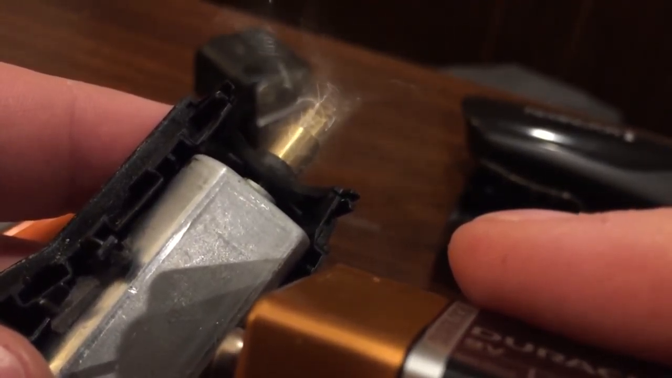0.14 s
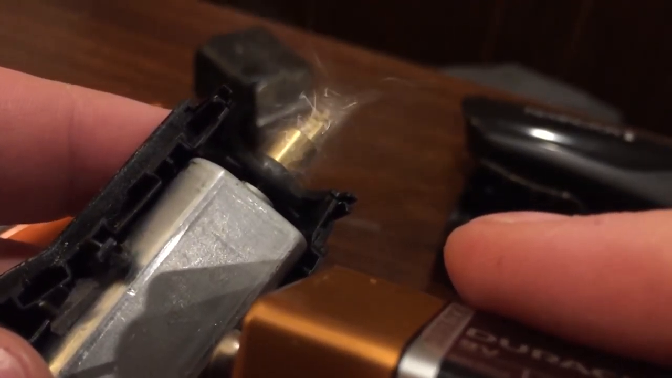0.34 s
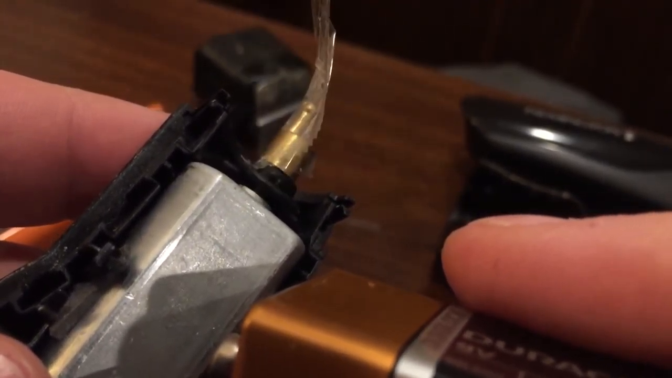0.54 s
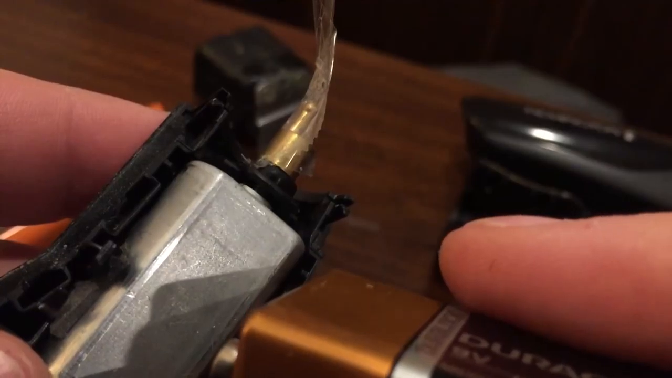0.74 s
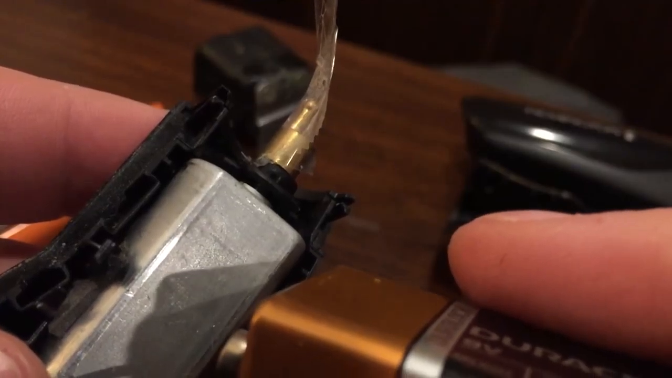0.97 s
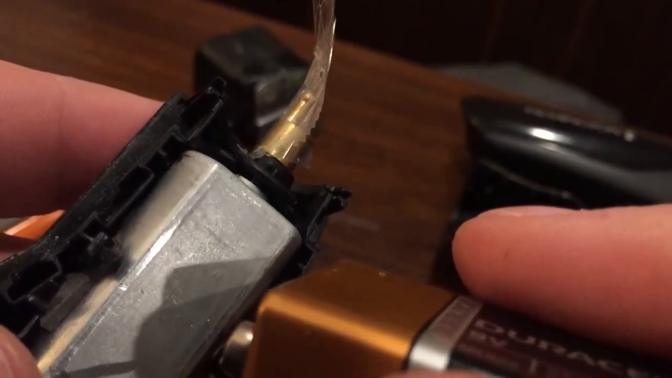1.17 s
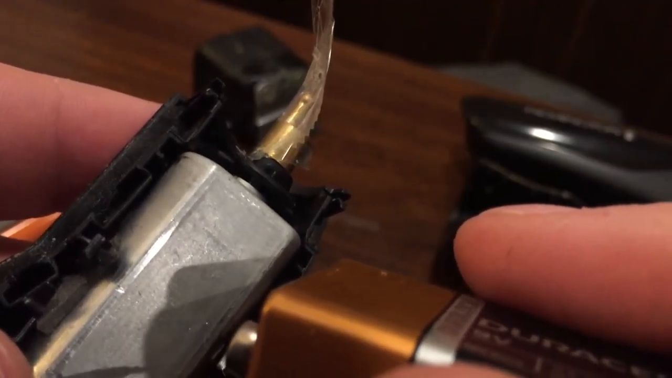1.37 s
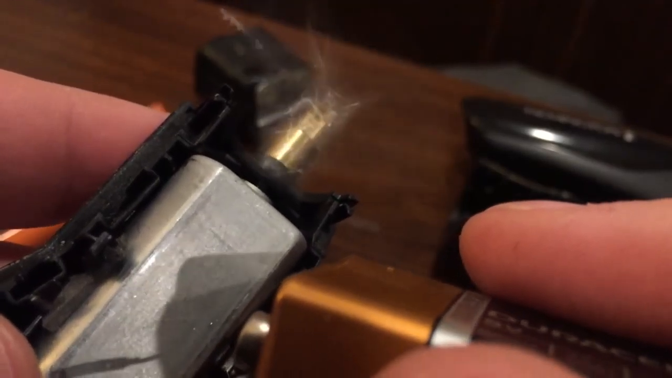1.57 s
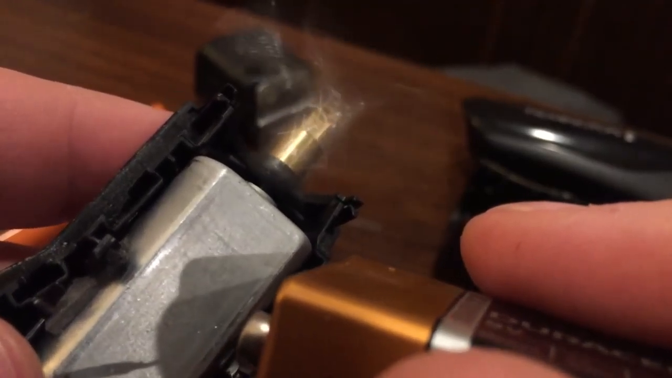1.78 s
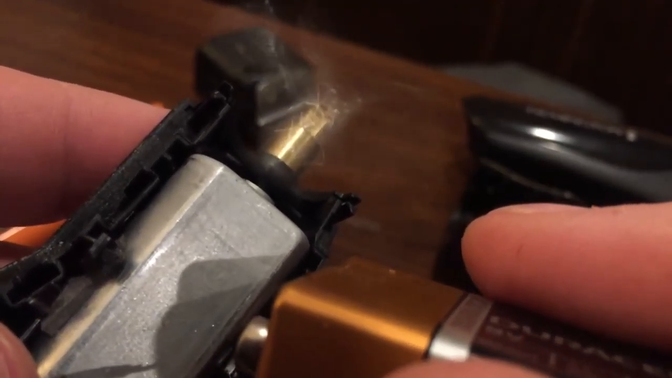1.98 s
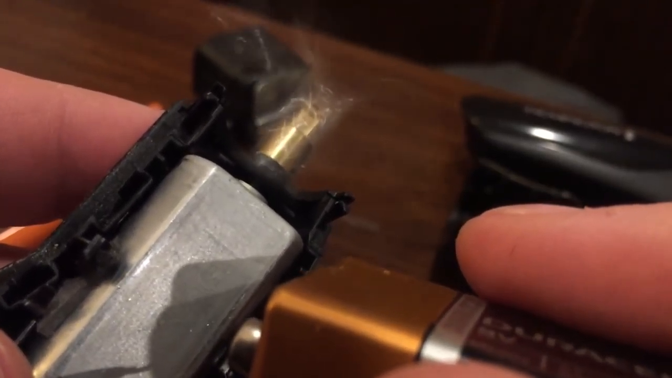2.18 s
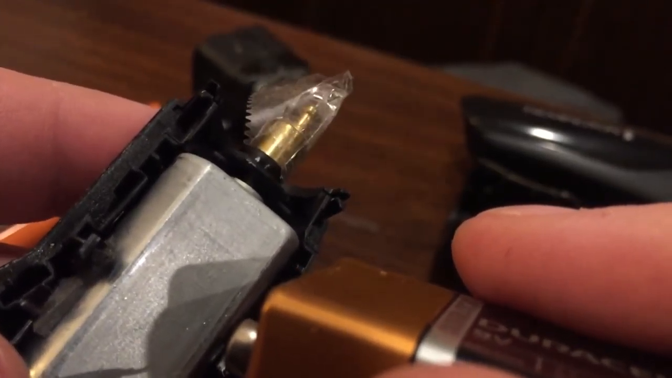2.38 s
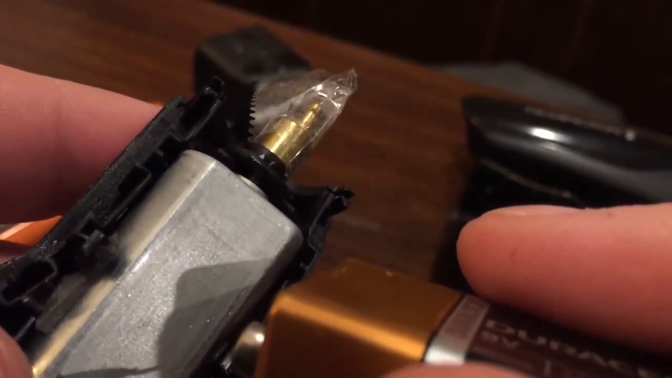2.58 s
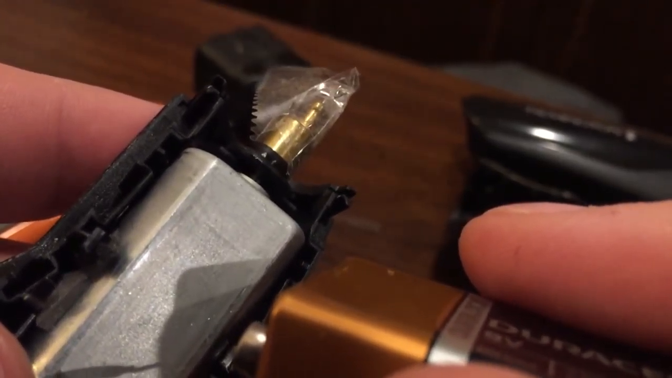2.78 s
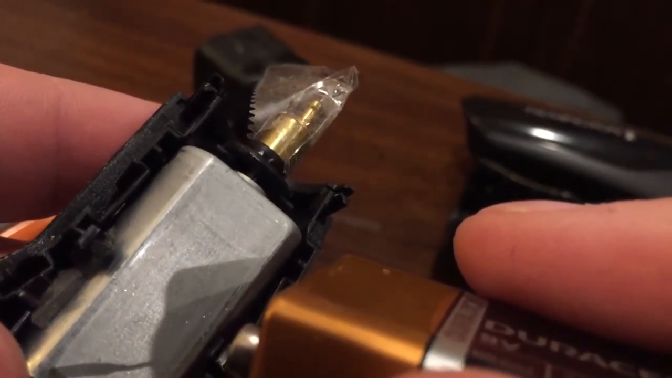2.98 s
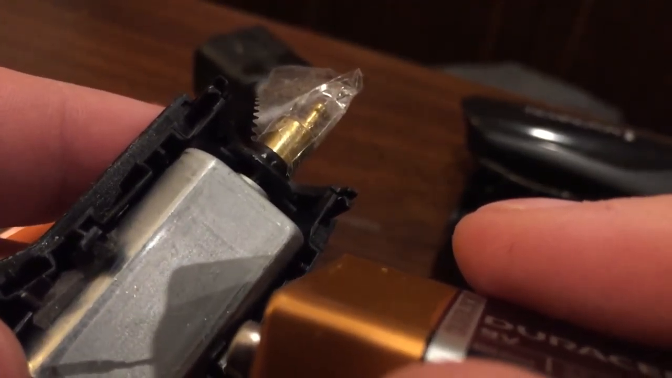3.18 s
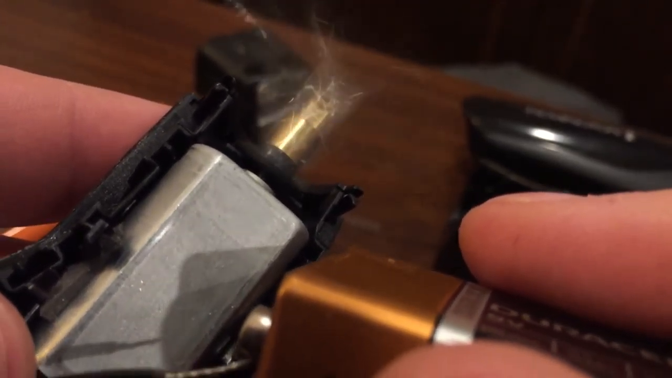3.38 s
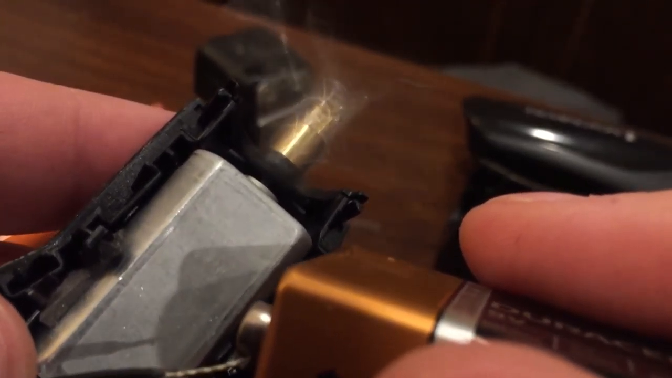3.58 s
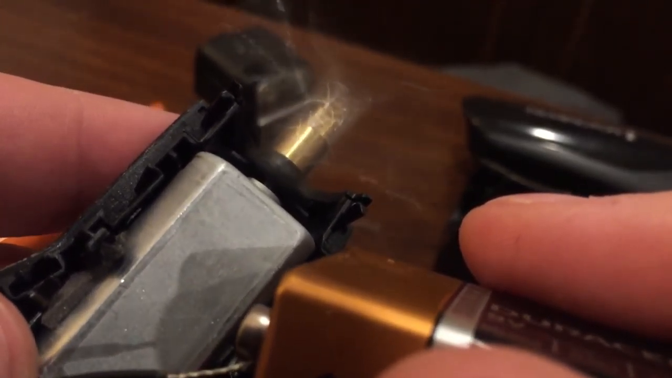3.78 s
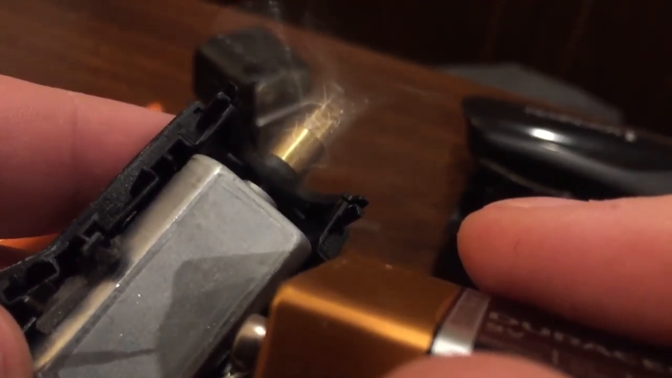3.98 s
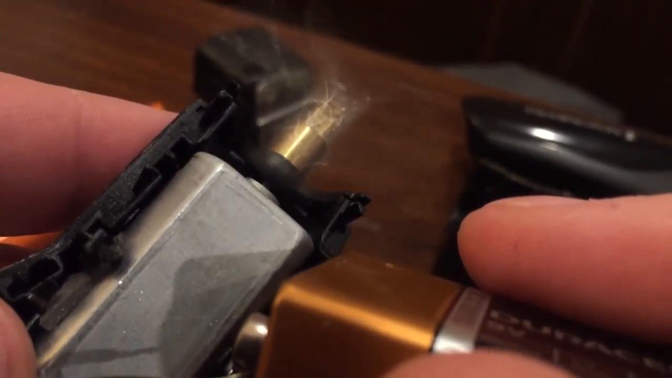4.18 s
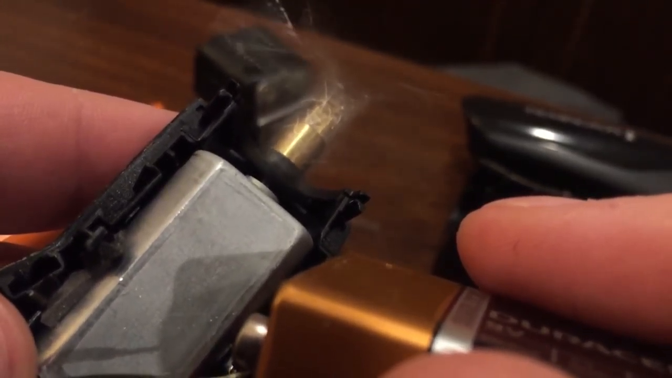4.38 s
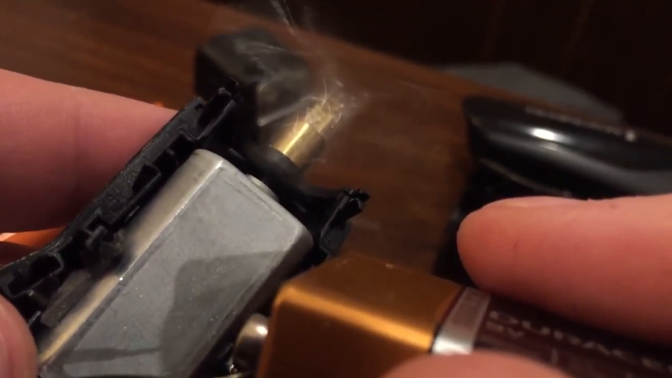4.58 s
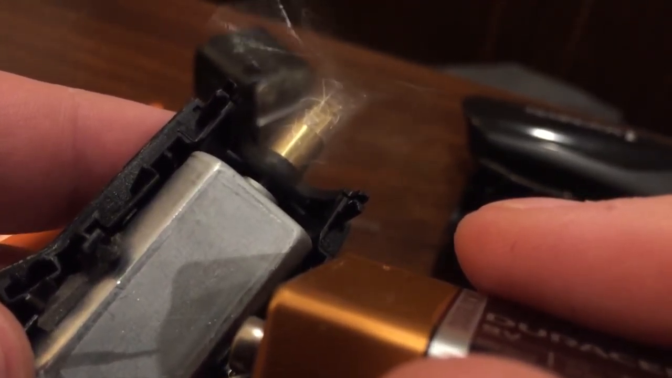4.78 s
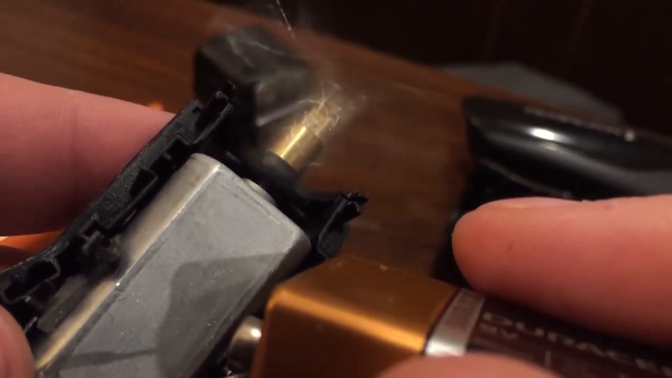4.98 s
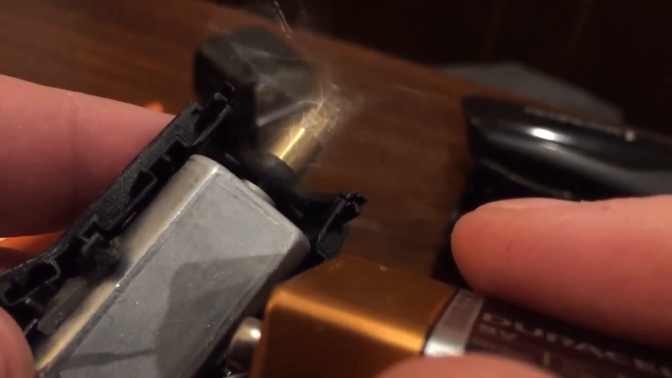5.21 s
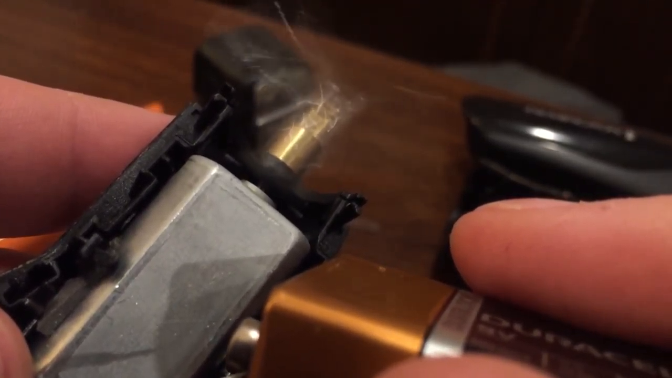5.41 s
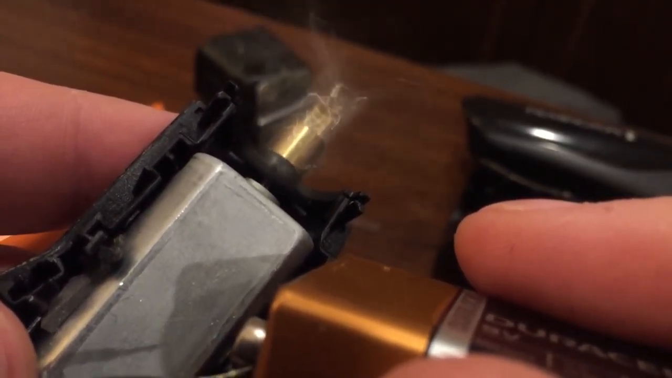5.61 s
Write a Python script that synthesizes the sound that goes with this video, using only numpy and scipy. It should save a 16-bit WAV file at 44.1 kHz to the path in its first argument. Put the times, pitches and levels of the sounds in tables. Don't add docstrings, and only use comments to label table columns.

```python
import sys
import numpy as np
from scipy import signal
from scipy.fft import rfft, irfft, next_fast_len
from scipy.io import wavfile
from scipy.ndimage import uniform_filter1d, map_coordinates

SR = 44100
rng = np.random.default_rng(int(sys.argv[2]) if len(sys.argv) > 2 else 0)


def gain_from_decibels(decibels):
    exponent = np.asarray(decibels, float) / 20
    return 10 ** exponent


def wav_record(signal):
    frames = np.transpose(np.atleast_2d(signal))
    bounded = np.clip(frames, -1, 1)
    quanta = np.round(bounded * 32767).astype(np.int16)
    wavfile.write(sys.argv[1], SR, quanta)


N = 249165

# (frequency [Hz], level [dB per Hz])
ROOM_MURMUR = [(25, -48), (60, -27), (200, -20.5), (270, -14), (370, -4), (440, -10.5), (580, 0), (730, -8),
               (800, -18), (1100, -18), (1500, -22.5), (2000, -28.5), (2700, -28.5), (3300, -48)]
# (frequency [Hz], width [Hz], level [dB])
APPLIANCE_TONES = [(91, 13, -67), (1677, 7.9, -65.5)]
# (frequency [Hz], level [dB per Hz])
MIC_HISS = [(1500, -29), (3000, -4), (4300, -3.5), (7000, -13.5), (10500, -16.5), (15700, -21)]
# (frequency [Hz], time [s])
ECHO_TIME = [(300, 0.23), (3000, .2), (12000, 0.052)]

# (time [s], peak [dB], bracket [relative dB], treble [relative dB])
FINGER_TICKS = [(0.7626, -40, -20, -21), (0.7707, -40.5, -18, -26), (0.7804, -49, -7.5, -25),
                (0.8027, -48, -11, -27), (0.8565, -51, 3, -19), (0.864, -44.5, 9.5, -29),
                (0.875, -35, -17, -25), (0.879, -41, -20, -22), (1.0447, -46, -1, -20),
                (1.061, -49, -2, -19.5), (1.1, -44, -10, -18), (1.108, -48, 1, -18), (1.1494, -46, -9, -23),
                (1.3177, -42, -12, -25.5), (1.325, -41, -10, -24), (1.332, -45, -18, -30),
                (1.384, -48, -7, -21), (1.491, -46, -15, -28), (1.5, -46, -14, -24), (2.471, -37, -23, -15),
                (2.6284, -43, -13, -21), (2.8647, -36.5, -18, -29), (2.9167, -55, 2.5, -21),
                (3.3015, -46.5, -6, -27), (3.31, -49, -10, -22), (3.317, -38.5, -17, -29),
                (3.3533, -33.5, -19, -21), (3.373, -31, -13, -11), (3.4301, -43, -9, -22),
                (3.4457, -36, -12, -23)]
# (time [s], peak [dB], bracket [relative dB], treble [relative dB])
SHARP_SNAPS = [(0.441, -20, -2, -8), (0.451, -28, -3, -5), (0.4627, -28, -6, 6), (0.484, -32.5, -14, -6),
               (0.4898, -30, -19, -12), (0.4973, -17.5, -13, 2.5), (1.6266, -33, -2, -12),
               (1.638, -28, -8, 2), (1.651, -17, -19, 3.5), (1.6673, -19.5, -17, -8),
               (1.677, -15.5, -24, -3), (1.688, -12.5, -20, -12), (1.6974, -8, -21, -9.5),
               (2.3553, -24.5, -14, -7), (2.378, -17, -32, -2), (2.391, -40, -12, -11.5),
               (3.1565, -20, -18, -10.5), (3.453, -30.5, -5, -14), (3.463, -34, -20, 5),
               (3.473, -31, -11, 0), (3.487, -13.5, -21, -3), (3.507, -13.5, -24, -8),
               (3.5386, -9, -22, -14), (3.5515, -8, -22, -9)]
# (frequency [Hz], width [Hz], level [dB])
HOUSING_PEAKS = [(2560, 647, -2.5), (3390, 860, 0), (4250, 600, 2), (5860, 1100, -2.5), (7390, 1700, -4.5)]
# (frequency [Hz], width [Hz], level [dB])
SHEET_PEAKS = [(8750, 910, -7), (9740, 500, 11), (10250, 1480, 9), (11000, 430, 12), (11400, 700, 5.5),
               (12600, 800, 4.5), (13750, 540, 5), (15300, 1500, -7.5)]

# (on [s], off [s], unloaded speed [Hz], tape lift [dB])
BATTERY_CONTACTS = [
    (0.0, 0.244, 147.3, 2.5),
    (0.255, 0.343, 144.9, -0.3),
    (0.378, 0.421, 114.8, 1),
    (0.455, 0.475, 62.05, -2.5),
    (1.648, 2.293, 150.7, 1.6),
    (3.462, 4.747, 150.5, 0.85),
    (4.784, 5.7, 151.6, 0.7),
]
# (time [s], drag [Hz], rasp [dB])
GEAR_BINDS = [(0.116, 30.8, 1.5), (0.231, 26.5, 1), (1.81, 16.7, 0), (1.908, 10.2, 2), (2.068, 27.3, 2),
              (2.229, 17.2, 1.5), (3.606, 4.9, 1.5), (3.725, 10.3, 0.3), (3.909, 28, 2), (4.066, 11.2, 0.3),
              (4.249, 25.7, 2), (4.415, 7.4, -0.8), (4.61, 27.3, 2.5), (4.718, 14.2, 0.7), (4.97, 25.5, 3),
              (5.121, 14.5, 0.8), (5.291, 29.5, 2.5), (5.435, 14.8, 0.9), (5.609, 25.9, 3)]
# (speed [Hz], level [dB])
WHIRR_BY_SPEED = [(5, -84.5), (25, -42), (45, -35.5), (70, -29), (105, -23), (145, -21)]
# (speed [Hz], level [dB])
FLUTTER_BY_SPEED = [(5, -82), (25, -49), (45, -45.5), (70, -38.5), (105, -31), (145, -27.5)]

# (speed [Hz], hum [dB])
SHAKING_BY_SPEED = [(8, -95), (30, -72), (48, -49), (62, -34), (94, -23.5), (124, -20), (144, -16)]
# (multiple of the turning rate [1], level [dB], phase [rad])
SHAKING_OVERTONES = [(2, -13.5, 0.89), (4, -40.5, -0.98)]
# (frequency [Hz], level [dB per Hz])
HAND_RATTLE = [(20, -35), (50, -6), (80, -4), (200, -5), (400, -16), (800, -19), (1200, -15), (1600, -54.5),
               (2500, -120)]
# (multiple of the turning rate [1], level [dB])
MAGNET_WHINE = [(5, -11), (6, -13.5), (7, -8), (8, -9.5), (9, -15.5), (10, -2), (11, -15), (12, -9.5),
                (13, -12.5), (14, -11.5), (15, -10), (16, -8.5), (19, -11), (20, -5), (25, -13),
                (26, -13.5)]
# (frequency [Hz], width [Hz], level [dB])
BRACKET_PEAKS = [(1910, 95, 13.5), (2760, 120, 8), (3527, 380, 11)]
# (place in the turn [0-1], click [dB])
COMMUTATOR_GAPS = [(0.042, -3.5), (0.361, -9.5), (0.579, -7)]
# (frequency [Hz], width [Hz], level [dB])
CASING_PEAKS = [(1443, 160, -11.5), (1988, 93, -5), (2722, 268, -7), (3540, 220, -1), (3857, 380, -2.5),
                (4491, 160, 9), (5190, 510, -2.5), (6025, 290, -6), (6534, 170, -3), (7300, 650, -12)]
# (frequency [Hz], width [Hz], depth [dB])
CASING_HOLES = [(2390, 780, -2.5), (3180, 150, -5.5), (4736, 250, -23.5), (6400, 450, -10),
                (10340, 770, -3.5)]


def unit(x):
    return x / np.sqrt(np.mean(x ** 2) + 1e-20)


def noise():
    return rng.standard_normal(N)


def along(points, hz):
    f, v = np.transpose(points)
    return np.interp(np.log(hz + 1), np.log(f + 1), v)


def wobble(rate):
    knots = rng.standard_normal(int(N * rate / SR) + 4)
    return map_coordinates(knots, [np.arange(N) * rate / SR])


def filtered(x, response):
    m = next_fast_len(N + SR // 2)
    return irfft(rfft(x, m) * response(np.fft.rfftfreq(m, 1 / SR)), m)[:N]


def resonances(peaks):
    def response(f):
        return sum((-1) ** k * gain_from_decibels(db) * 1j * f * w / (c * c - f * f + 1j * f * w)
                   for k, (c, w, db) in enumerate(peaks))
    return response


def shaped_noise(spectrum):
    return unit(filtered(noise(), lambda hz: gain_from_decibels(along(spectrum, hz))))


def room_tone():
    murmur = gain_from_decibels(-50 + 0.8 * wobble(11) + 1.1 * wobble(50)) * shaped_noise(ROOM_MURMUR)
    tones = np.zeros(N)
    for hz, width, db in APPLIANCE_TONES:
        tone = unit(filtered(noise(), resonances([(hz, width, 0)])))
        tones += gain_from_decibels(db + 3.5 * wobble(16)) * tone
    return murmur + tones + gain_from_decibels(-74) * shaped_noise(MIC_HISS)


def walls(x):
    hz, t, z = signal.stft(rng.standard_normal(SR // 2), SR, nperseg=256)
    fade = gain_from_decibels(-60 * t / along(ECHO_TIME, hz)[:, None])
    tail = signal.istft(z * fade, SR, nperseg=256)[1]
    return signal.fftconvolve(x, tail / np.linalg.norm(tail))[:N]


def ticks():
    finger_t60_ms, snap_t60_ms = 16.4, 14.4
    contacts = [(*row, finger_t60_ms) for row in FINGER_TICKS]
    contacts += [(*row, snap_t60_ms) for row in SHARP_SNAPS]
    bursts = np.zeros((3, N + SR))
    t = np.arange(SR // 10) / SR
    for s, db, bracket_db, treble_db, t60_ms in sorted(contacts):
        onset = 1 - np.exp(-t / (0.00012 * t60_ms))
        scrape = gain_from_decibels(db - 60000 * t / t60_ms) * onset * rng.standard_normal(len(t))
        shares = gain_from_decibels(np.array([[bracket_db + 20.5], [8], [treble_db - 0.5]]))
        start = round(s * SR)
        bursts[:, start:start + len(t)] += shares * scrape
    bracket = filtered(bursts[0, :N], lambda hz: resonances([(1750, 500, 0)])(hz) ** 2)
    housing = filtered(bursts[1, :N], lambda hz: resonances(HOUSING_PEAKS)(hz) ** 2)
    return bracket + housing + filtered(bursts[2, :N], resonances(SHEET_PEAKS))


def shaft():
    start_hz, spin_up_s, brake_hz_per_s = 121.08, 0.125, 1209
    current_gain_db, stall_db = 1.4, 9
    bind_s, rasp_s, rasp_late_s = 0.064, 0.03, 0.021
    tape_rasp = 1.8
    t = np.arange(N) / SR
    speed, live, lift_db = np.full(N, start_hz), np.zeros(N), np.zeros(N)
    for on, off, free_hz, tape_db in BATTERY_CONTACTS:
        a = round(max(on, 0) * SR)
        approach = np.exp((on - np.minimum(t[a:], off)) / spin_up_s)
        driven = free_hz + (speed[a] - free_hz) * approach
        speed[a:] = np.maximum(driven - brake_hz_per_s * np.maximum(t[a:] - off, 0), 0)
        live[a:] = (t[a:] < off) * (current_gain_db + stall_db * (1 - driven / free_hz))
        lift_db[a:] = tape_db
    drag = sum(hz * np.exp(-((t - s) / bind_s) ** 2) for s, hz, _ in GEAR_BINDS)
    rasp_db = sum(db * np.exp(-((t - s - rasp_late_s) / rasp_s) ** 2) for s, _, db in GEAR_BINDS)
    keep = np.exp(-1 / (spin_up_s * SR))
    speed = np.maximum(speed - signal.lfilter([1 - keep], [1, -keep], drag), 0.1)
    current_db = uniform_filter1d(live, size=400)
    whirr_db = along(WHIRR_BY_SPEED, speed) + current_db + rasp_db
    flutter_db = along(FLUTTER_BY_SPEED, speed) + current_db + tape_rasp * rasp_db
    return speed, whirr_db, flutter_db + uniform_filter1d(lift_db, size=400)


def shaking(angle, speed):
    hum = np.cos(angle)
    for k, db, phase in SHAKING_OVERTONES:
        hum += gain_from_decibels(db + 0.75 * wobble(22)) * np.cos(k * angle + phase)
    rattle = gain_from_decibels(-21.5) * shaped_noise(HAND_RATTLE)
    return gain_from_decibels(along(SHAKING_BY_SPEED, speed)) * (np.sqrt(2) * gain_from_decibels(0.77 * wobble(30)) * hum + rattle)


def magnet_whine(angle):
    whine = np.zeros(N)
    for k, db in MAGNET_WHINE:
        whine += gain_from_decibels(db + 2.4 * wobble(18)) * np.cos(k * angle + 0.72 * wobble(40) + k * k)
    return gain_from_decibels(-16.0) * filtered(whine, lambda hz: 1 + resonances(BRACKET_PEAKS)(hz))


def bearing_and_kicks(angle, speed):
    groan = gain_from_decibels(-24.5) * unit(filtered(noise(), resonances([(1070, 500, 0.1)])))
    kick_size = gain_from_decibels(-26 + 3.2 * wobble(9)) * 135 / (speed + 30)
    return groan + kick_size * np.cos(len(COMMUTATOR_GAPS) * angle - 2.5)


def clicks(turns, place, jitter, scatter_db):
    whole = np.arange(1, int(turns[-1]) - 1)
    chance = rng.standard_normal((len(whole), 2))
    at = np.interp(whole + place + jitter * chance[:, 0], turns, np.arange(N))
    size = gain_from_decibels(scatter_db * chance[:, 1])
    out, part = np.zeros(N + 1), at % 1
    np.add.at(out, at.astype(int), size * (1 - part))
    np.add.at(out, at.astype(int) + 1, size * part)
    return out[:N]


def gap_clicks(turns, jitter, scatter_db):
    return sum(gain_from_decibels(db) * clicks(turns, place, jitter, scatter_db) for place, db in COMMUTATOR_GAPS)


def cancelled(hz):
    return np.prod([(c * c - hz * hz + 1j * hz * w * gain_from_decibels(db)) / (c * c - hz * hz + 1j * hz * w)
                    for c, w, db in CASING_HOLES], axis=0)


def brushes(turns, angle, pace, whirr_db, flutter_db):
    strikes = gap_clicks(turns, jitter=0.0035, scatter_db=0.5)
    skips = gap_clicks(turns, jitter=0.013, scatter_db=4.5)
    bounce = signal.lfilter([1], [1, -np.exp(-1 / (0.00029 * SR))], skips)
    bounce = uniform_filter1d(bounce, size=25)
    tight_spot = np.exp(np.minimum(0.35 / pace ** 2, 0.7) * (np.sin(angle + 0.37) - 1))
    pressure = 0.55 * tight_spot + 0.42 * bounce
    seat = gain_from_decibels(1.1 * wobble(25) + 0.5 * wobble(90))
    scrape = unit(pressure * noise()) + 0.56 * unit(strikes)
    casing = unit(filtered(seat * scrape, resonances(CASING_PEAKS)))
    flutter = seat * (pressure + 1.8 * bounce) * noise()
    sheet = unit(filtered(flutter, resonances(SHEET_PEAKS)))
    return filtered(gain_from_decibels(whirr_db) * casing + gain_from_decibels(flutter_db) * sheet, cancelled)


def motor():
    speed, whirr_db, flutter_db = shaft()
    turns = np.cumsum(speed * (1 + 0.002 * wobble(30))) / SR
    angle = 2 * np.pi * turns
    pace = speed / 135
    tones = pace ** 3.2 * magnet_whine(angle) + bearing_and_kicks(angle, speed)
    brush_noise = brushes(turns, angle, pace, whirr_db, flutter_db)
    moving = np.minimum(speed / 8, 1)
    return moving * (shaking(angle, speed) + brush_noise + gain_from_decibels(whirr_db) * tones)


def scene():
    near = motor() + ticks()
    echo = walls(filtered(near, lambda hz: hz / (hz + 600)))
    return (near + gain_from_decibels(-14.0) * echo + room_tone())[None]


def roll_off(x):
    return signal.sosfilt(signal.butter(12, 17060, fs=SR, output="sos"), x)


def record(dry):
    top_hz, edge_hz = 15750, 150
    rounded = dry[0] / (1 + np.abs(dry[0]) ** 6) ** (1 / 6)
    limited = filtered(rounded, lambda hz: np.clip((top_hz - hz) / edge_hz + 0.5, 0, 1))
    return roll_off(limited[None])


dry = scene()
out = record(dry)
wav_record(out)
```